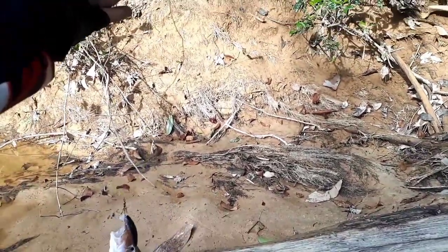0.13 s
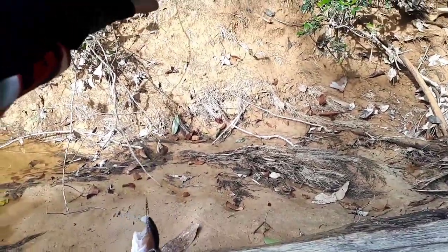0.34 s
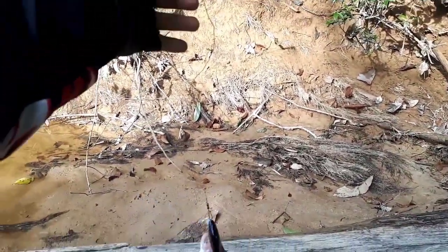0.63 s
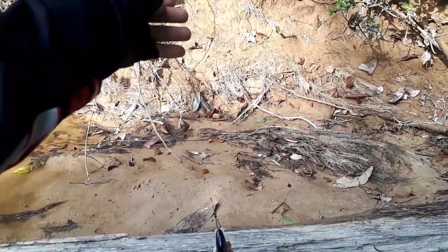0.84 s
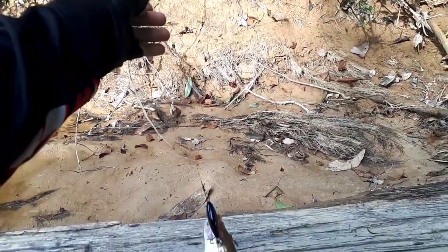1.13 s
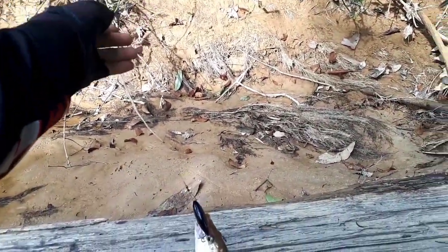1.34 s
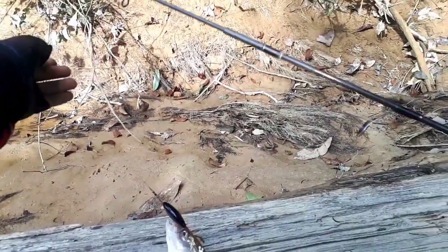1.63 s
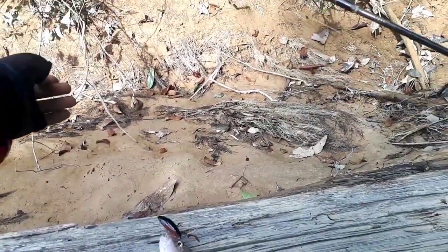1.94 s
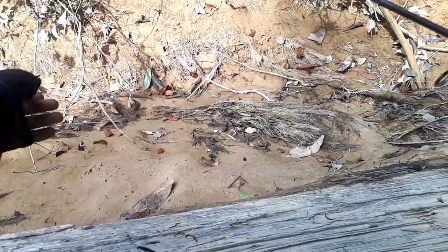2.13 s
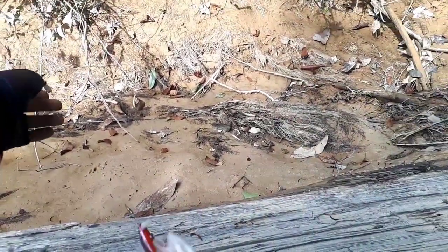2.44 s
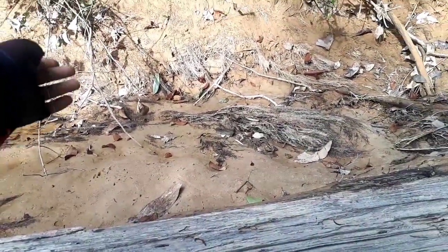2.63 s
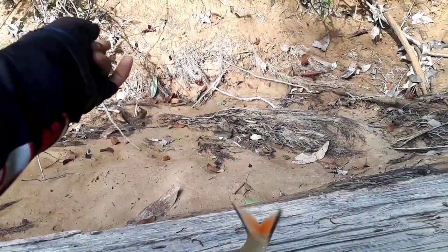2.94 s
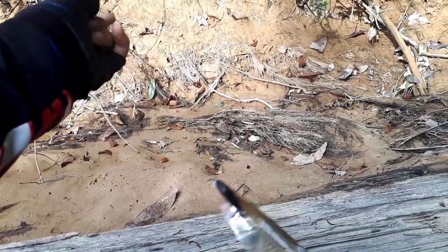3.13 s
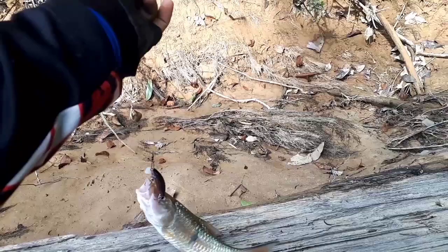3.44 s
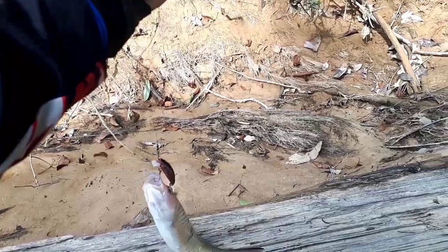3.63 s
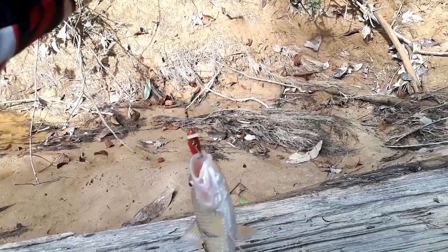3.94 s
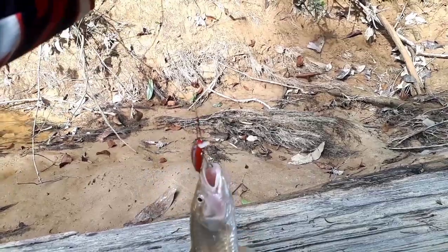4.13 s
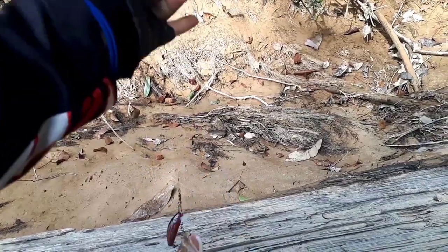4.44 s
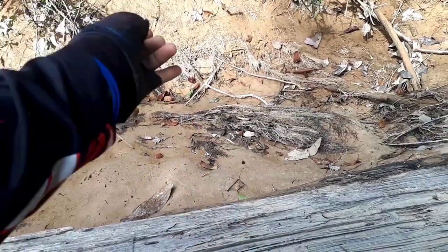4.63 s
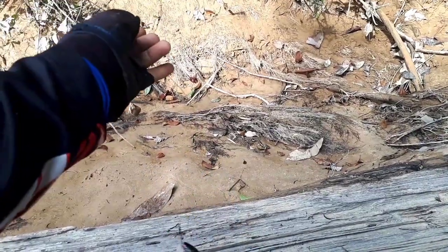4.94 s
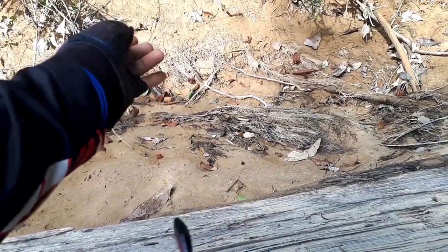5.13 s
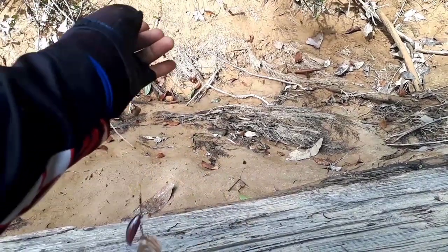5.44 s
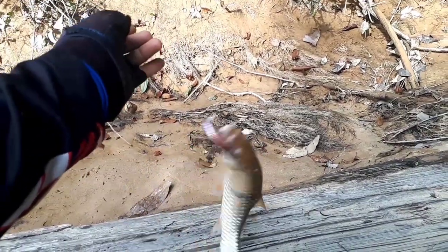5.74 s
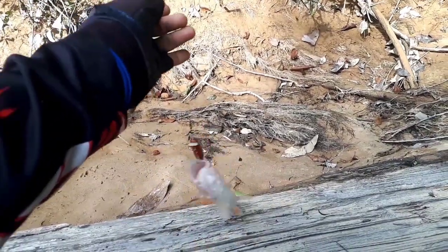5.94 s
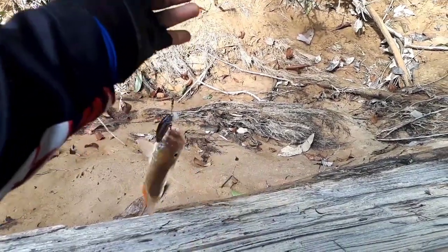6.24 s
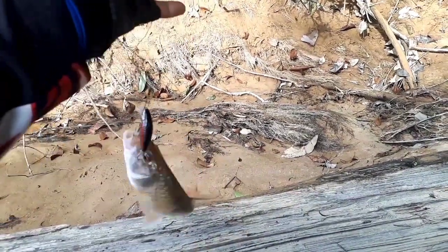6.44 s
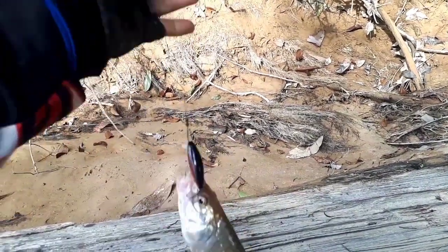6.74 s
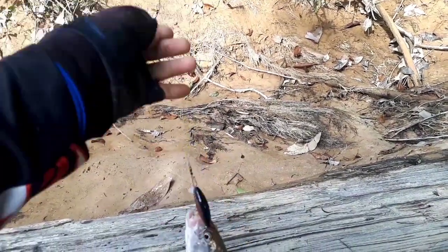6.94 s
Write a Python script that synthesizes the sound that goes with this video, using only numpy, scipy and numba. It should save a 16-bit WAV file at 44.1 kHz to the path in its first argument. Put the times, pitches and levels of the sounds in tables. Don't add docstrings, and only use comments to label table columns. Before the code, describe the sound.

High steady cicadas and a soft river and leaf hiss lie under everything. Wind thuds low on the left and whistles in hollow gliding notes, stronger on the right, early on. Close by, a hooked fish knocks a dry log: sharp plastic cracks, damp slaps, low shoves and short scrapes in irregular clusters around two and a half, three, four and a half and five and a half seconds, ending in faint metallic chinks.

```python
import sys
import numpy as np
from scipy import signal
from scipy.fft import rfft, irfft, next_fast_len
from scipy.io import wavfile
from scipy.ndimage import uniform_filter1d
from numba import njit

SR = 44100
rng = np.random.default_rng(int(sys.argv[2]) if len(sys.argv) > 2 else 0)


def attenuation_scalar(level_db):
    decades = np.asarray(level_db, float) / 20
    return 10 ** decades


def master(y):
    cut = np.clip(np.atleast_2d(y).T, -1, 1)
    pcm = np.round(cut * 32767)
    wavfile.write(sys.argv[1], SR, pcm.astype(np.int16))


N = 311787


def curve(table):
    s, first, *rest = np.transpose(table)
    t = np.arange(N) / SR
    return [np.interp(t, s, first, -140, -140)] + [np.interp(t, s, c) for c in rest]


def unit(x):
    return x / np.sqrt(np.mean(x ** 2, axis=-1, keepdims=True))


def band(x, lo_hz, hi_hz, order=2):
    edges_hz = [lo_hz, min(hi_hz, 20000)]
    return signal.sosfilt(signal.butter(order, edges_hz, "band", fs=SR, output="sos"), x)


def modes(x, table):
    return sum(attenuation_scalar(db) * band(x, hz - w / 2, hz + w / 2, order=1) for hz, w, db in table)


def walk(rate):
    k = int(SR / rate)
    held = np.repeat(rng.standard_normal(N // k + 1), k)
    return 1.69 * uniform_filter1d(uniform_filter1d(held, k), k)[:N]


def pair(shape, alike):
    same, left, right = rng.standard_normal((3, *shape))
    return np.sqrt(alike) * same + np.sqrt(1 - alike) * np.array([left, right])


def add(out, times, grains):
    for s, grain in zip(times, grains):
        i = max(int(s * SR), 0)
        out[i:i + len(grain)] += grain[:len(out) - i]


def swells(table, longest_s):
    s, db, rise_db, fall_db = np.array(table).T[:4, :, None]
    t = np.arange(0, N, 16) / SR
    let_go = np.clip((s + longest_s - t) / 0.051, 0, 1)
    gain = attenuation_scalar(db - np.where(t < s, rise_db * (s - t), fall_db * (t - s))) * let_go
    return np.repeat(gain, 16, axis=1)[:, :N]


@njit
def svf(x, hz, width):
    y, b, l = np.empty(len(x)), 0., 0.
    for i in range(len(x)):
        g, k = np.tan(np.pi * hz[i] / SR), width / hz[i]
        v = (b + g * (x[i] - l)) / (1 + g * (g + k))
        b, l, y[i] = 2 * v - b, l + 2 * g * v, k * v
    return y


# (time [s], lag of the right port [samples])
FISH_LAG = [(0, 6), (2.7, 6), (2.95, 0), (3.5, 0), (4.0, 2), (4.9, 2), (5.2, 0), (5.6, 6)]


def ports(x, pan_db):
    n = np.arange(N)
    lag = np.round(np.interp(n / SR, *np.transpose(FISH_LAG))).astype(int)
    return np.array([x[0] * attenuation_scalar(pan_db / 2), x[1][np.maximum(n - lag, 0)] * attenuation_scalar(-pan_db / 2)])


def softer(crack_db):
    loud_db, longer_per_db, longest = -28.5, 0.06, 1.75
    return min(np.exp(longer_per_db * (loud_db - crack_db)), longest)


# (time [s], crack level [dB], treble over crack [dB], thud over crack [dB], ring pitch [Hz])
CLACKS = [(0.1155, -37, -10, -36, 3600), (0.1176, -30, -10, -49, 3370), (0.1205, -31, -16, -26, 1090),
          (0.1241, -18, -8, -51, 3400), (2.0108, -32, 3, -25, 4200), (2.3171, -45, -12, -7.5, 2260),
          (2.4518, -30.5, -13, -29, 4000), (2.463, -31, -4, -34, 4900), (2.4722, -24.5, -3, -17, 4280),
          (2.4816, -19, -3, -18, 4900), (2.483, -25, 0, -25, 5200), (2.4848, -28, 2, -27, 4300),
          (2.491, -34, 7, -17, 6960), (2.499, -29, -2, -23, 2940), (2.5307, -42, -9, -30, 7900),
          (2.5352, -38.5, -10, -28, 4040), (2.547, -52, -6, -30, 7600), (2.5679, -38, -14, -10.5, 3800),
          (2.9884, -25.5, -11, -52, 4320), (2.9896, -18, -2, -40, 7900), (2.9908, -26, -9, -34, 4100),
          (2.9925, -33, -10, -36, 2920), (3.03, -50, -10, -7, 3700), (3.3947, -47, 6, -9, 8300),
          (3.3999, -42, 0, -17, 3880), (3.4073, -46, -7, -14, 4600), (3.411, -28, 6.5, -20, 3920),
          (3.417, -46, 2, -22, 4260), (4.6705, -41, 0, -25, 4910), (4.7012, -37.5, -16, -15, 4050),
          (4.7035, -38, -12, -21, 3010), (4.7062, -31, -8, -20, 2070), (4.709, -33, -12, -20, 2200),
          (4.716, -36, 6, -27, 5000), (5.6558, -40.5, 2, -25, 4740), (5.68, -46, -8, -25, 5500),
          (5.716, -34, 3, -24, 5000), (5.7184, -30, 2, -27, 4520), (5.7214, -35.5, -3, -27, 4850),
          (5.7312, -33, -6, -25, 4600), (5.7397, -40, -7, -25, 5430)]


def clacks():
    ring_db, t60_ms = 5, 12.8
    return [(*row, ring_db, t60_ms * softer(row[1])) for row in CLACKS]


# (time [s], crack level [dB], treble over crack [dB], thud over crack [dB], ring pitch [Hz])
SLAPS = [(2.5013, -38, -9.5, -8, 1130), (2.9936, -35, -15, -12.5, 1420), (4.69, -35, 7, -23, 2110),
         (4.72, -24, 4, -13, 2170), (4.7218, -37, 12, -22, 1080), (4.7535, -47, -4, -3, 1900),
         (5.1417, -48, 2, -15, 1060), (5.1457, -41, 2, -13, 6500), (5.148, -36, 4.5, -28, 11600),
         (5.156, -32, 5, -32, 5060), (5.1715, -50, -2, -22, 4540), (5.1875, -36, -8, -9, 3010),
         (5.1896, -35, 3, -15, 1400), (5.1996, -37.5, 6, -8, 1520), (5.277, -48.5, 7, -3, 980),
         (5.652, -39.5, -10, -24, 1580), (5.6638, -49, -15, 2, 875), (5.67, -35.5, -6, -20, 1130),
         (5.6918, -37, -10, -11, 1080), (5.7022, -31, -26, -27, 1600), (5.734, -30, -7, -16, 1730),
         (5.738, -34, -7, -26, 1700)]


def slaps():
    ring_db, t60_ms = 1.8, 10.1
    return [(*row, ring_db, t60_ms * softer(row[1])) for row in SLAPS]


LIGHT_THUD_DB = -25

# (time [s], level [dB], ring pitch [Hz])
TICKS = [(0.0672, -49, 1010), (0.14, -62, 2200), (0.162, -40, 2250), (0.181, -48, 2260), (0.2135, -58, 850),
         (0.223, -42.5, 2900), (0.2555, -44, 2250), (0.5915, -51, 2240), (2.2283, -46.5, 840),
         (2.2376, -38.5, 2200), (2.25, -37.5, 2270), (2.264, -39, 2200), (2.275, -43, 2240),
         (2.2575, -42, 2200), (2.3635, -45, 2300), (2.3758, -41, 2400), (2.39, -38.5, 2290),
         (2.407, -43, 2310), (4.784, -58, 3780), (5.1137, -54, 950), (5.207, -56, 1160),
         (5.2903, -45, 1210), (5.349, -51, 993), (5.802, -46, 1085), (5.816, -45.5, 1820),
         (5.846, -53, 1060), (5.996, -52, 1850)]


def ticks():
    treble_db, ring_db, t60_ms = -10, 6.5, 33
    return [(s, db - ring_db, treble_db, LIGHT_THUD_DB, hz, ring_db, t60_ms) for s, db, hz in TICKS]


# (time [s], treble level [dB], ring pitch [Hz])
CHINKS = [(2.6914, -46, 9000), (2.8373, -38, 14600), (2.9742, -33, 7000), (3.154, -45, 9100),
          (3.1797, -39, 12100), (3.201, -41, 12300), (3.2144, -33, 11400), (3.4872, -44, 12000),
          (3.4943, -30, 13500), (3.495, -23, 14600), (4.195, -43, 5000), (4.257, -52, 5000),
          (4.8307, -36.5, 11300), (4.944, -43, 11900), (4.957, -42, 12000), (4.9887, -50, 12000),
          (5.2534, -48, 11500), (5.281, -35, 12200), (5.334, -43, 9200), (5.61, -40, 11700),
          (5.6214, -45.5, 12100), (5.6345, -65, 9000), (6.002, -42, 12000), (6.013, -45, 12000),
          (6.026, -45, 12000), (6.138, -43, 5000), (6.608, -49, 12000), (6.618, -46, 12000),
          (6.6772, -45.5, 11200), (6.852, -44, 12200)]


def chinks():
    body_db, ring_db, t60_ms = -13, 7, 8.8
    return [(s, db + body_db, -body_db, LIGHT_THUD_DB, hz, ring_db, t60_ms) for s, db, hz in CHINKS]


def hits():
    blows = clacks() + slaps() + ticks() + chinks()
    s, db, treble_db, thud_db, hz, ring_db, t60_ms = np.array(blows).T[:, :, None]
    t = np.arange(4096) / SR
    noise = pair((len(s), len(t)), alike=0.053)

    def fade(stretch):
        t60_s = np.maximum(t60_ms, 1) * stretch / 1000
        return (1 - np.exp(-t / 0.00057)) * attenuation_scalar(-60 * t / t60_s)

    def burst(lo_hz, hi_hz, stretch):
        return unit(band(noise, lo_hz, hi_hz)) * (fade(stretch) + attenuation_scalar(-21.0) * fade(2.4))

    ring = attenuation_scalar(ring_db) * np.sin(2 * np.pi * hz * t) * fade(0.9)
    crack = burst(650, 7760, 1.08) + ring
    partial_hz = 1200 * 10 ** rng.uniform(0, 1, (len(s), 8)).T[:, :, None]
    tilt_db = np.where(partial_hz > 6500, treble_db, 0)
    partials = attenuation_scalar(tilt_db - 18.0) * np.sin(2 * np.pi * partial_hz * t)
    crack = crack + partials.sum(0) * fade(2.1)
    splat = attenuation_scalar(treble_db + 3.5) * burst(5060, 14200, 0.55)
    thud = attenuation_scalar(thud_db) * unit(band(noise.mean(0), 220, 990)) * fade(4.5)
    hollow = attenuation_scalar(thud_db - 22.0) * np.sin(2 * np.pi * 200 * t) * fade(1.2)
    out = np.zeros((2, N))
    for ear, grains in zip(out, attenuation_scalar(db + 2.5) * (crack + splat + thud + hollow)):
        add(ear, s[:, 0], grains)
    return ports(out, pan_db=-3.5)


# (time [s], peak level [dB], pitch [Hz], decay t60 [ms])
THUMPS = [(2.4675, -39, 496, 9.8), (2.472, -32, 725, 13), (2.9912, -30, 1130, 8.7),
          (2.9945, -39.5, 694, 56), (3.4095, -40.5, 470, 21), (4.6905, -36.5, 800, 10),
          (4.7215, -35, 604, 10), (5.1405, -43, 238, 24), (5.1525, -32.5, 225, 40),
          (5.1595, -28.5, 325, 14), (5.168, -40, 400, 22), (5.1868, -29.5, 350, 12),
          (5.1898, -29, 605, 8.5), (5.2115, -40, 484, 12), (5.229, -40, 500, 13), (5.6645, -43, 485, 14),
          (5.6712, -31.5, 380, 10), (5.7062, -27.5, 184, 20.5), (5.7195, -33.5, 495, 15),
          (5.7342, -36.5, 610, 17)]


def thumps():
    s, db, hz, t60_ms = np.array(THUMPS).T[:, :, None]
    t = np.arange(4096) / SR
    rise_cycles = 0.24
    rise = 1 - np.exp(-t * hz / rise_cycles)
    decay = attenuation_scalar(db + 4 - 60 * t / (t60_ms / 1000))
    out = np.zeros(N)
    add(out, s[:, 0], rise * decay * np.sin(2 * np.pi * hz * t))
    return ports([out, out], pan_db=-5.0)


# (peak time [s], peak level [dB], rise [dB/s], fall [dB/s], treble over level [dB])
SCRAPES = [(0.105, -50, 304, 493, -38.5), (0.119, -35.5, 2497, 947, -12), (0.144, -55, 897, 31, -11),
           (0.772, -49, 74, 56, -4), (1.246, -60.5, 20, 295, -4.5), (2.222, -51, 2000, 21, -1.5),
           (2.466, -35.5, 2000, 158, -7), (2.498, -42.5, 202, 502, -1.5), (2.58, -64, 500, 95, -22),
           (2.83, -62, 305, 296, 0), (2.963, -52, 2000, 152, -3), (3.203, -58.5, 2500, 250, 13),
           (5.708, -44.5, 1500, 400, -6), (2.25, -50.5, 398, 203, -3), (2.39, -52, 203, 203, -10),
           (2.989, -40, 4000, 1400, 2.5), (3.003, -46, 2002, 154, -6.5), (3.237, -58, 224, 129, -8),
           (3.411, -49, 401, 184, -2), (4.2, -63, 125, 94, -36), (4.673, -52.5, 3000, 60, -0.5),
           (4.708, -37.5, 604, 500, -7), (4.728, -49.5, 900, 190, -6), (5.106, -59, 2000, 152, -11),
           (5.151, -46, 900, 163, -1), (5.197, -42, 256, 354, -0.5), (5.288, -51.5, 254, 237, -0.5),
           (5.74, -46.5, 144, 472, -1), (5.758, -47, 900, 114, -3.5), (5.99, -64, 900, 97, 2),
           (6.11, -56, 900, 65, 0), (6.15, -55, 150, 500, -2), (2.531, -46, 1500, 500, 2)]
# (centre [Hz], width [Hz], level [dB])
LURE = [
    (1080, 41, 5.5),
    (2200, 210, -3.5),
    (4040, 2000, 1.5),
    (5000, 57, -3),
]


def scrapes():
    gains = swells(SCRAPES, longest_s=0.23)
    level = gains.sum(0)
    treble = attenuation_scalar(np.array(SCRAPES)[:, -1]) @ gains
    slips = pair((N,), alike=0.35) * attenuation_scalar(2.4 * walk(600))
    body = unit(unit(modes(slips, LURE)) + 2.0 * unit(band(slips, 204, 5320)))
    hiss = unit(band(slips, 4320, 29500))
    return ports(attenuation_scalar(-1.0) * level * body + attenuation_scalar(1.5) * treble * hiss, pan_db=-2.5)


# (time [s], peak level [dB], pitch [Hz])
BUFFETS = [(0.36, -43, 92), (0.434, -28.5, 112), (0.451, -38, 141), (0.504, -38.5, 95), (0.533, -35, 124),
           (0.554, -38, 75), (0.932, -33, 105), (0.986, -34.5, 124), (1.025, -27.5, 132), (1.057, -31, 98),
           (2.275, -42, 64), (2.327, -27, 190), (2.351, -29.5, 69), (2.369, -31, 84), (2.515, -25, 144),
           (2.532, -32, 151), (2.551, -30, 122), (2.566, -28, 173), (2.59, -32.5, 138), (2.658, -31, 81),
           (2.749, -40.5, 88.5), (3.814, -32, 130), (3.837, -26.5, 134), (3.85, -34.5, 73),
           (3.928, -43.5, 120), (3.945, -38, 106), (5.445, -35, 115), (5.527, -34.5, 104),
           (5.55, -36.5, 62), (5.584, -45, 64)]


def buffets():
    s, db, hz = np.array(BUFFETS).T[:, :, None]
    t = np.arange(-1200, 1200) / SR
    turn = rng.uniform(0, 2 * np.pi, (len(s), 1))
    kicks = attenuation_scalar(db) * np.exp(-(t * hz / 0.54) ** 2) * np.cos(2 * np.pi * hz * t + turn)
    left = np.zeros(N)
    add(left, s[:, 0] + t[0], kicks)
    left += attenuation_scalar(-22) * np.abs(left) * unit(band(rng.standard_normal(N), 170, 450))
    return np.array([left, np.zeros(N)])


# (peak time [s], peak level [dB], rise [dB/s], fall [dB/s])
GUSTS = [
    (0.4, -52.5, 198, 39),
    (0.98, -64, 23, 165),
    (1.5, -70, 29, 103),
    (2.5, -58, 55, 55),
    (3.3, -72, 74, 61),
    (3.78, -58.5, 205, 75),
    (5.67, -69.5, 18, 74),
    (7.0, -75, 6, 5),
]


def rumble():
    calm_db = -80
    noise = unit(band(pair((N,), alike=0.3), 50, 165, order=3)) * attenuation_scalar(3.5 * walk(14))
    gust = swells(GUSTS, longest_s=N / SR).sum(0) + attenuation_scalar(calm_db)
    return noise * gust * attenuation_scalar(np.array([[4], [-3]]))


# (peak time [s], peak level [dB], rise [dB/s], fall [dB/s], note [Hz])
WHISTLE = [
    (0.06, -59, 40, 70, 857),
    (0.23, -60, 38, 31, 734),
    (0.72, -50, 48, 40.5, 590),
    (0.88, -50.5, 87, 122, 725),
    (0.87, -78, 69, 55, 900),
    (1.22, -59.5, 55, 44, 943),
    (1.55, -65.5, 17, 89, 880),
    (1.87, -57, 61, 112, 752),
    (2.05, -61, 97, 20, 574),
    (2.38, -56, 32, 73, 629),
]


def whistle():
    notes = swells(WHISTLE, longest_s=N / SR)
    air = pair((N,), alike=0.38)
    tone = 0.45 * notes.sum(0) * unit(band(air, 500, 1080, order=3))
    drift = 1 + 0.03 * walk(5)
    for gain, (*_, note_hz) in zip(notes, WHISTLE):
        glide_hz = note_hz * drift
        tone += gain * unit(np.array([svf(a, glide_hz, 99.0) for a in air]))
    return tone * attenuation_scalar(1.5 * walk(15.86) + np.array([[-5], [-1.5]]))


# (time [s], chorus level [dB], overtone over chorus [dB])
CICADAS = [
    (0.0, -58, -6.5),
    (1.32, -60, -7.5),
    (2.6, -59, -6.5),
    (7.07, -59.5, -6.5),
]
# (centre [Hz], width [Hz], level [dB])
SONG = [
    (6978, 110, -2),
    (7285, 630, -5.5),
    (8060, 290, -12.5),
]
# (centre [Hz], width [Hz], level [dB])
OVERTONE = [
    (13900, 1100, 0),
    (15000, 1500, 0),
]


def cicadas():
    db, overtone_db = curve(CICADAS)
    clicks = rng.standard_normal((2, N)) * attenuation_scalar(1.0 * walk(400) + 0.84 * walk(20))
    song = unit(band(modes(clicks, SONG), 6345, 8540, order=6))
    overtone = unit(band(modes(clicks, OVERTONE), 13200, 16500, order=4))
    return (song + attenuation_scalar(overtone_db) * overtone) * attenuation_scalar(db + np.array([[0], [4]]))


# (frequency [Hz], density [dB per Hz])
RIVER = [(30, -112), (50, -100), (120, -90), (250, -102), (500, -100), (1000, -99)]
# (frequency [Hz], density [dB per Hz])
HISS = [(1250, -108), (2500, -105), (4000, -111), (6000, -112), (9500, -111), (12800, -107), (16000, -107)]


def bank():
    pan_db = -7.5
    size = next_fast_len(N)
    hz = np.maximum(np.arange(size // 2 + 1) * SR / size, 1)
    same, left, right = rfft(rng.standard_normal((3, size)))
    alike = np.clip(1.2 - hz / 700, 0, 0.7)
    points, db = np.transpose([*RIVER, *HISS])
    colour = attenuation_scalar(np.interp(np.log(hz), np.log(points), db)) * np.sqrt(SR / 2)
    noise = np.sqrt(alike) * same + np.sqrt(1 - alike) * np.array([left, right])
    air = irfft(colour * noise, size)[:, :N]
    sway_db = 1.2 * walk(5)
    return air * attenuation_scalar(sway_db + np.array([[0.5], [-0.5]]) * pan_db)


def scene():
    fish = hits() + thumps() + scrapes()
    wind = buffets() + rumble() + whistle()
    return fish + wind + cicadas() + bank()


def top_cut(x):
    return signal.sosfilt(signal.butter(12, 16640, fs=SR, output="sos"), x)


def record(dry):
    dry = signal.sosfilt(signal.butter(2, 45, "high", fs=SR, output="sos"), dry)
    low = signal.sosfiltfilt(signal.ellip(8, 0.1, 40, 15650, fs=SR, output="sos"), dry)
    top = attenuation_scalar(-22) * (dry - low)
    return top_cut(low + top)


dry = scene()
out = record(dry)
master(out)
```